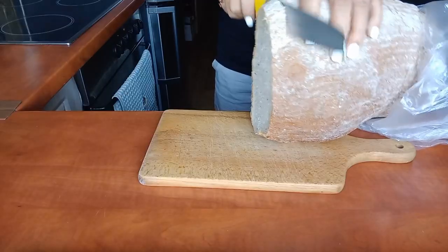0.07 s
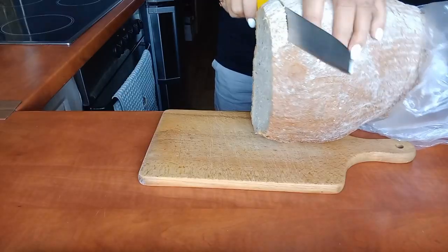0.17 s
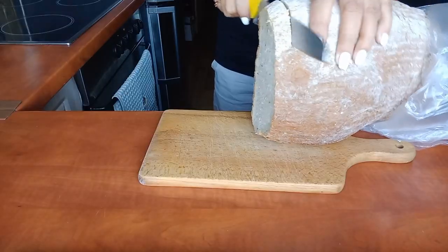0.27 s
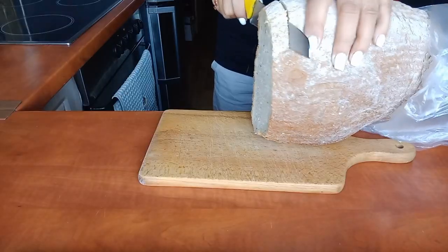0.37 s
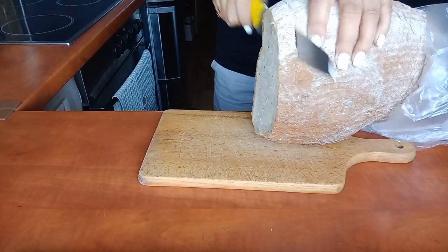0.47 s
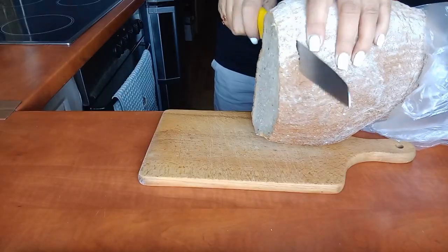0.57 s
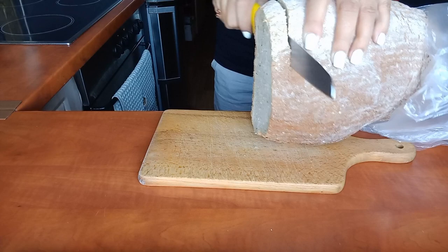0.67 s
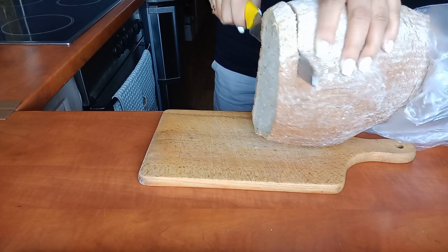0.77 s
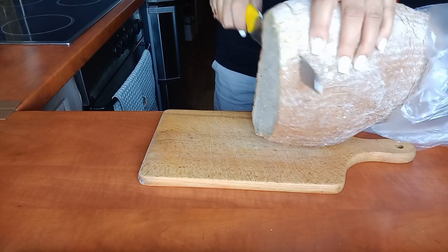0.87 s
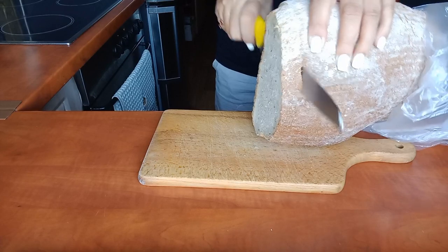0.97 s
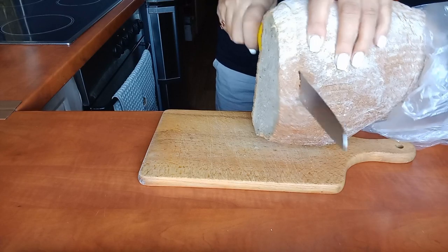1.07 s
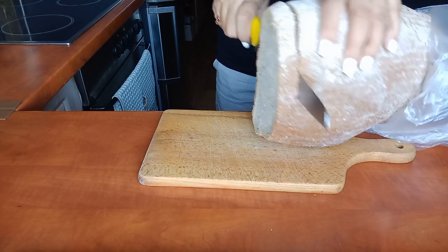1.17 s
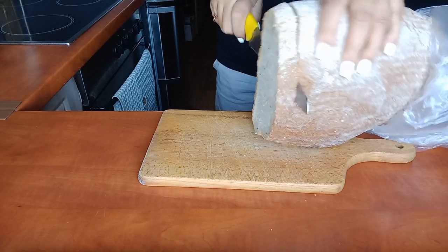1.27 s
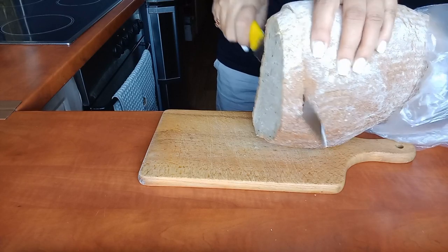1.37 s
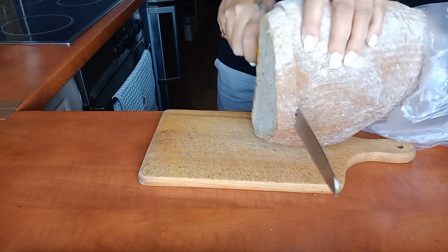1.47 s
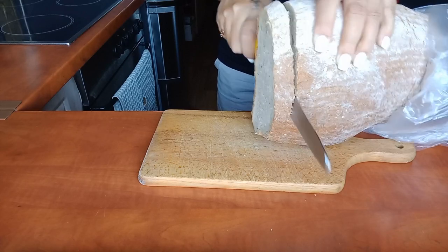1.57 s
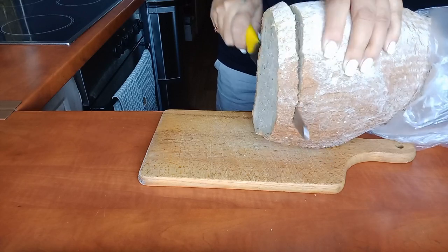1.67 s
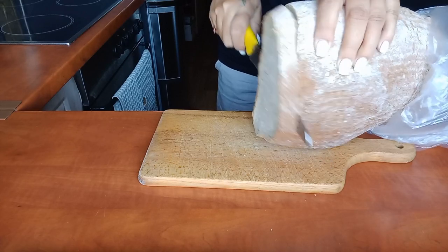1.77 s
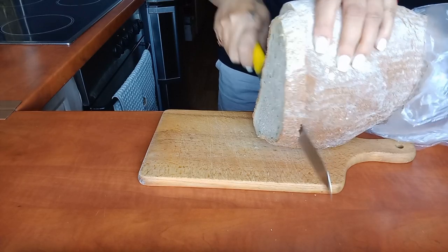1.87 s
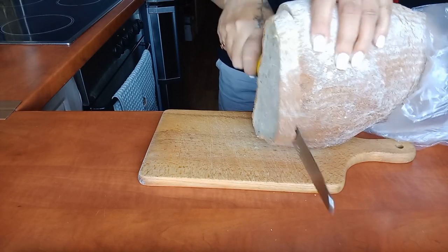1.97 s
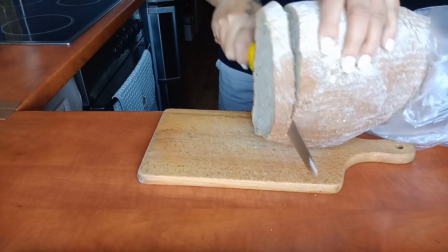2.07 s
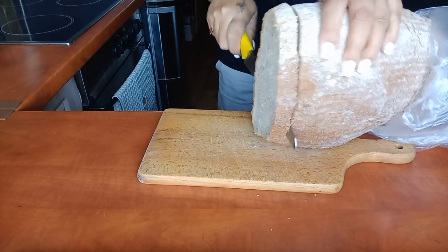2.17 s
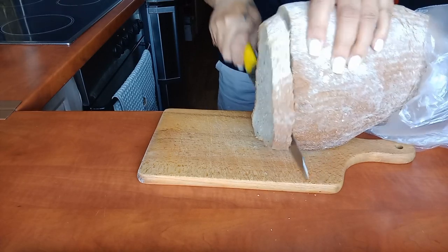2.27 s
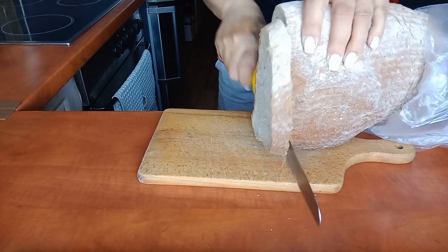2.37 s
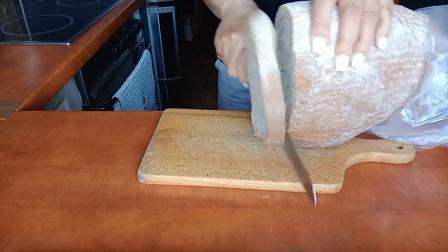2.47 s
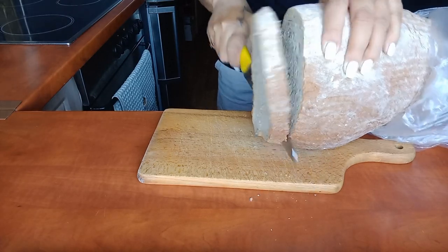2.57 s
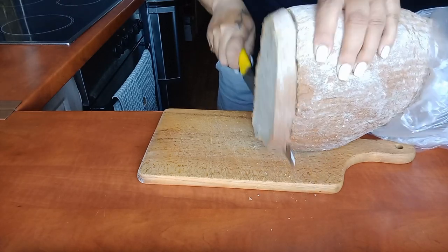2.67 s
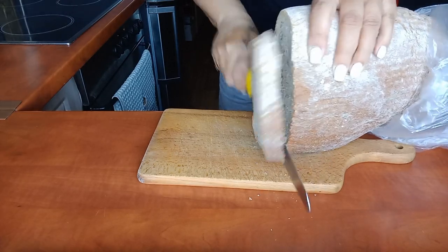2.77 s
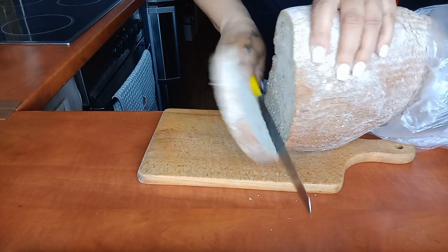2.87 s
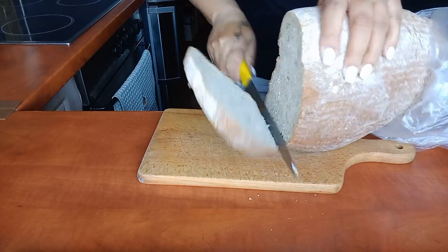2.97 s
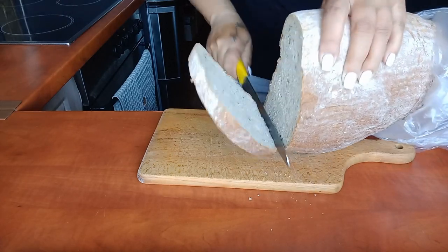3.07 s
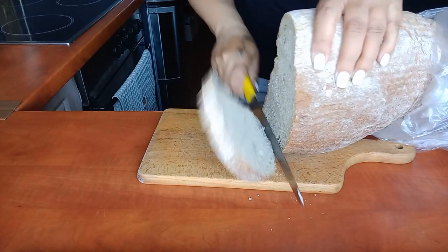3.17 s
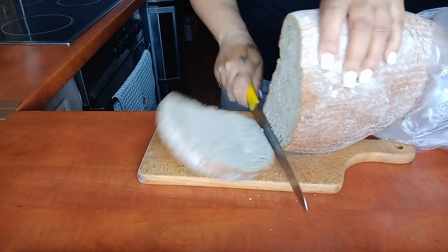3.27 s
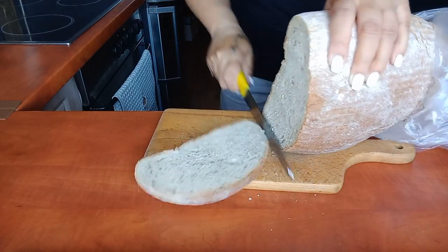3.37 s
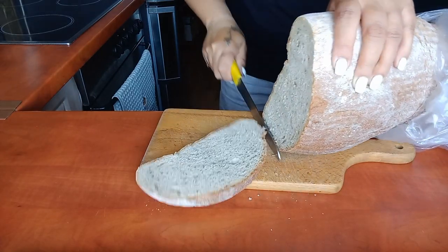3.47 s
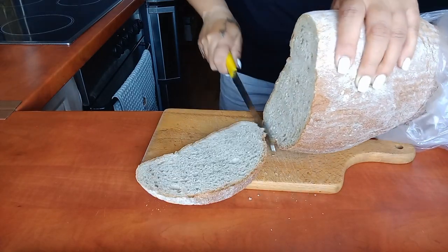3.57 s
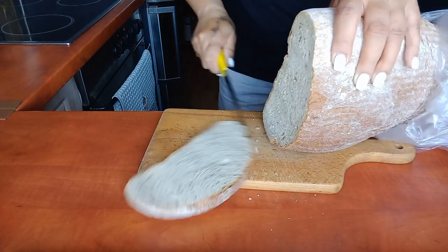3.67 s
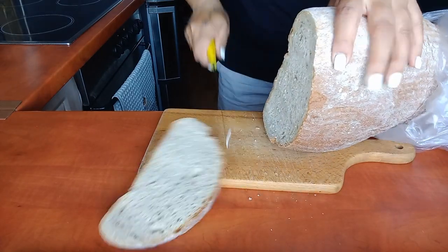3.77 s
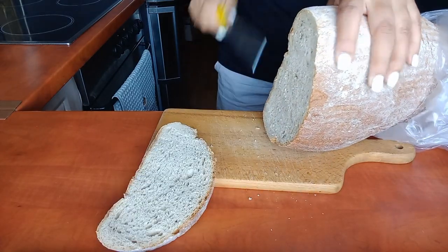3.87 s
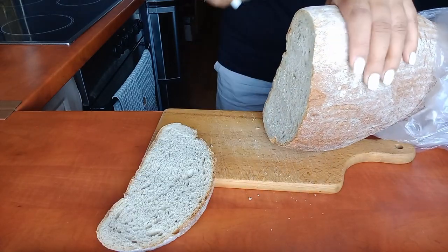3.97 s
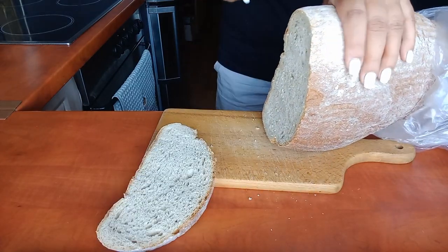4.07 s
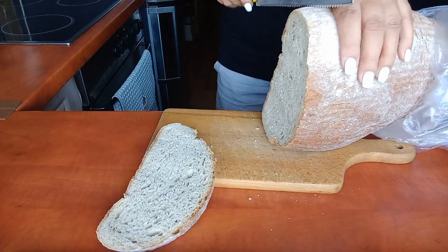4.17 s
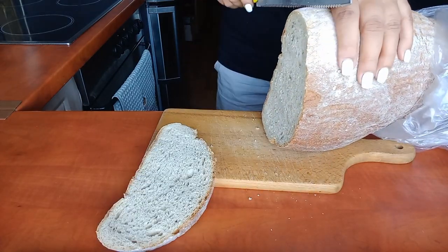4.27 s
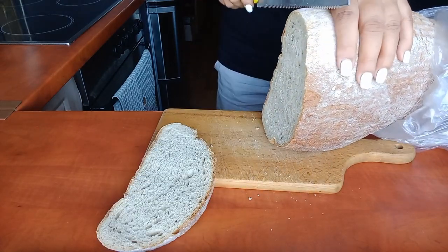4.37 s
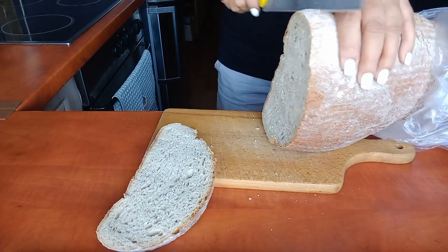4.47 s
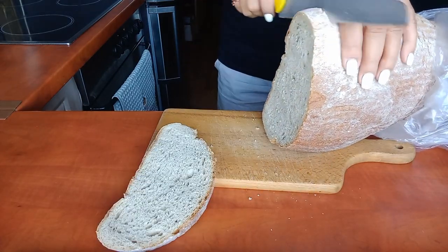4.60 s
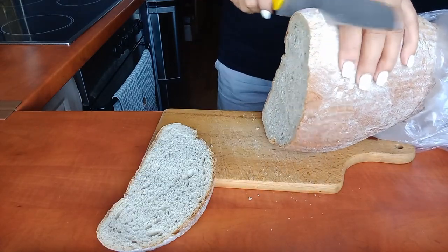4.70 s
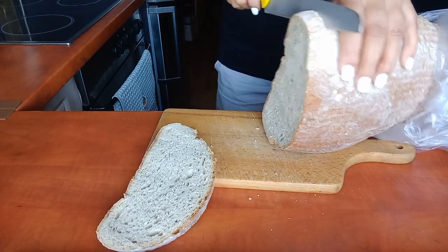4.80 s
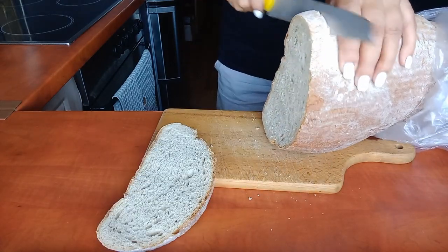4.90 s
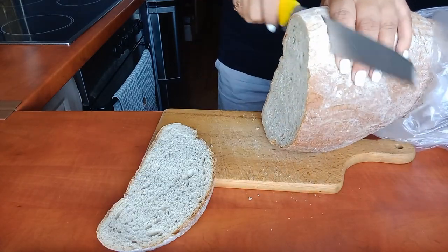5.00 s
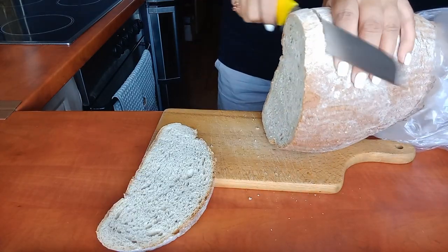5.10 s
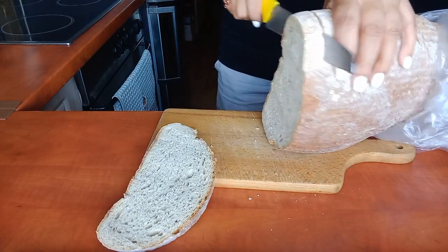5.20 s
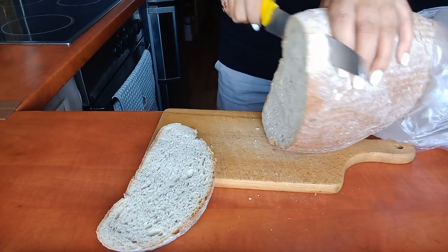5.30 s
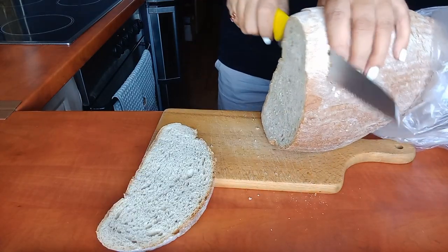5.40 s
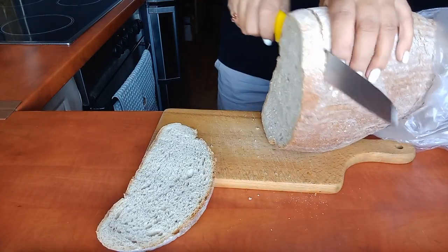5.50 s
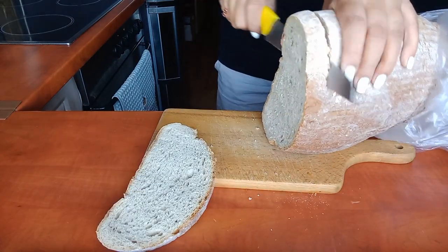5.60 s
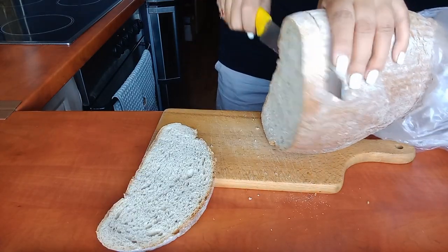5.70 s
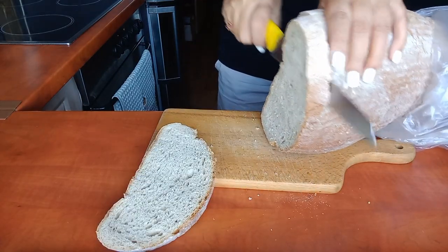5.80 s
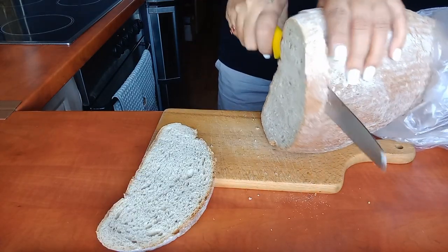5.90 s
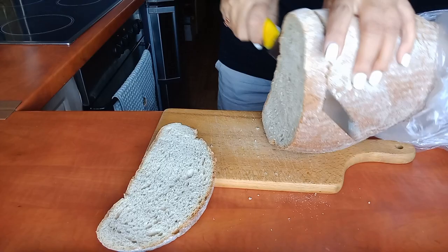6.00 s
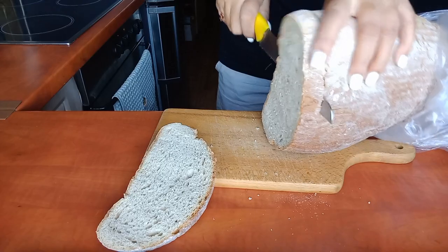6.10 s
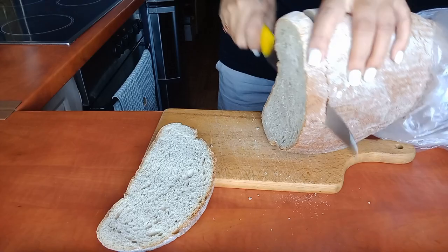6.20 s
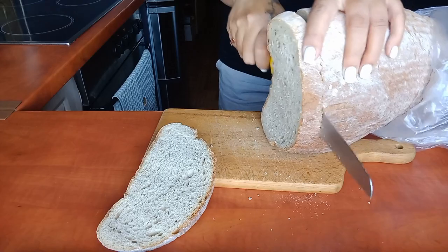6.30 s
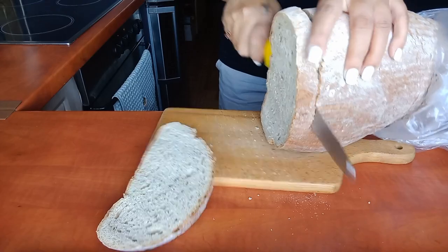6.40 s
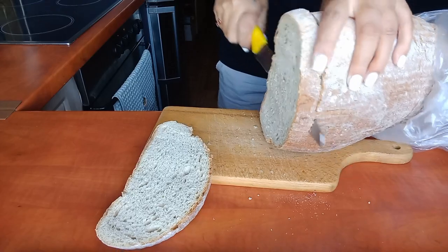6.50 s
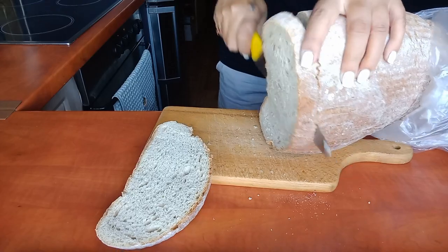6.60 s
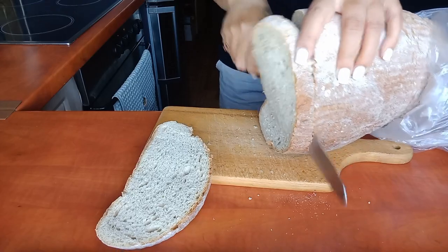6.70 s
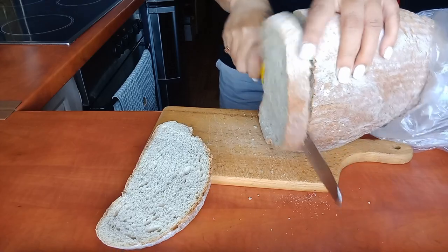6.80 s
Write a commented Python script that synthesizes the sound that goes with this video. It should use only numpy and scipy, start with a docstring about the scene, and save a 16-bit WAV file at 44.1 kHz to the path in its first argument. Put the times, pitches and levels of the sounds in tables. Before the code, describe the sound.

From the start, a serrated knife saws through a crusty loaf at about four strokes a second. The crust crackles, flakes snap and the loaf thuds softly on a wooden board, while a hollow rasp rises in pitch as the blade sinks. At about 3.4 seconds the knife breaks through and hits the board with a sharp knock, the loudest moment; the last crust tears and the blade skids briefly over the wood. The board chatters lightly until 3.7 seconds under a thin hiss as the slice falls. A plastic bag rustles faintly around 4 seconds and again from 4.5 to 5. The second slice starts gently at 4.5 seconds, and full, crunchy strokes run from about 5 seconds until nearly 7. Everything sounds close, in a bare, slightly ringing kitchen with a faint, low appliance hum.

```python
"""Over a faint appliance hum in a bare, ringing kitchen, a serrated knife saws into a crusty loaf.
The teeth catch and slip: the crust crackles, the cut rasps, flakes snap, the loaf thuds on its board.
At 3.4 s the blade breaks through and knocks on the wood; the last crust tears and the blade skids.
The board chatters under a thin, crisp hiss as the blade slides out and the slice falls.
Later a plastic bag rustles, and at 4.5 s the next slice begins."""
import sys
import numpy as np
from scipy import signal
from scipy.fft import rfft, irfft
from scipy.io import wavfile
from scipy.ndimage import uniform_filter1d, minimum_filter1d

SR = 44100
rng = np.random.default_rng(int(sys.argv[2]) if len(sys.argv) > 2 else 0)


def transcribe(u):
    """Save the signal u as a 16-bit wav file named by the first command-line argument.

    u: samples, shape (n,) or (channels, n), limited to [-1, 1]; the rate is SR.
    q: integer samples, one column per channel.
    """
    v = np.clip(np.atleast_2d(u).T, -1, 1)
    q = np.round(v * 32767).astype(np.int16)
    wavfile.write(sys.argv[1], SR, q)


N = 302085
TIME = np.arange(N) / SR

# EQ of the room tone. Each row: frequency in Hz, relative level in dB.
ROOM_TONE_EQ = [(30, -33), (60, -11), (87, -1.5), (110, -12.5), (175, -2.5), (230, -16), (400, -19.5),
                (600, -22.5), (850, -17.5), (1100, -27.5), (2250, -31.5), (7650, -26.5), (9340, -34.5),
                (15800, -37.5)]
# The appliance's hum. Each row: frequency in Hz, level in dB.
HUM_PARTIALS = [(87, -72), (174, -66.5)]
PUSH, PULL = 0, 1
# Knife strokes. Each row: start in seconds, direction, length in seconds, bite of the teeth in dB,
# weight on the loaf in dB.
STROKES = [(.009, PUSH, 0.14, -40, -35.5), (0.251, PULL, 0.1, -36, -44), (.468, PUSH, 0.1, -42, -37),
           (.714, PULL, 0.094, -38.5, -33.5), (.915, PUSH, 0.14, -41.5, -35.5),
           (1.181, PULL, 0.1, -39, -32), (1.375, PUSH, 0.13, -37.5, -33), (1.62, PULL, 0.098, -37.5, -31.5),
           (1.829, PUSH, .13, -40.5, -34.5), (2.074, PULL, 0.14, -42.5, -34.5),
           (2.295, PUSH, 0.11, -39.5, -39.5), (2.533, PULL, 0.12, -42, -41),
           (2.731, PUSH, .12, -40.5, -43.5), (2.955, PULL, 0.14, -45.5, -42.5),
           (3.148, PUSH, 0.14, -40, -32), (3.321, PULL, 0.072, -46, -41), (3.39, PULL, 0.16, -36, -30),
           (4.507, PUSH, 0.12, -48.5, -40.5), (4.734, PULL, 0.11, -46.5, -44.5),
           (4.934, PUSH, .13, -37.3, -34), (5.148, PULL, 0.092, -37, -41), (5.34, PUSH, 0.12, -41, -32),
           (5.576, PULL, 0.097, -41, -35), (5.777, PUSH, 0.13, -40, -38), (6.003, PULL, 0.11, -39, -37),
           (6.201, PUSH, 0.13, -38.5, -32.5), (6.443, PULL, .1, -39, -33.5),
           (6.651, PUSH, 0.13, -39.5, -35)]
# Slices. Each row: time the blade enters in seconds, time by which the cut's hollow tone has risen
# to its highest in seconds, tooth rate on the pull in Hz, resonance of the shallow cut in Hz.
SLICES = [(0.0, 2.61, 124, 340), (4.5, 6.88, 163.3, 473)]
ENTERS, TONE_HIGHEST, PULL_RATE, SHALLOW_PITCH = 0, 1, 2, 3
# EQs of the crisp crust and the darker rasp. Each row: frequency in Hz, relative level in dB.
CRUST_EQ = [(600, -18), (1300, 0.5), (2000, 1.5), (3000, -1), (4700, -2.5), (6300, -4.5), (8300, -2),
            (9200, -13.5), (11000, -11), (13500, -10), (16000, -14)]
RASP_EQ = [(150, -17.5), (280, 4), (350, 3.5), (410, -2), (480, 3), (600, 0), (780, -2.5), (900, -2.5),
           (1050, -8.5), (1450, -6), (2200, -17), (4000, -37.5)]
# The loaf pressed on the board. Each row: frequency in Hz, gain in dB, 60 dB decay time in seconds.
LOAF_MODES = [(75.3, -24, .07), (103.3, 5, 0.16), (131.4, 0, 0.21), (175.8, -10, 0.45), (199.5, -2.5, 0.21),
              (214.2, -8.5, 0.298), (278.3, -17, 0.26)]
# Larger flakes snapping, and the loaf bumping the board. Each row: time in seconds, strength in dB.
SNAPS = [(0.0712, -10.5), (0.4638, -17.5), (1.009, -15), (1.473, -15), (1.6739, -21), (1.8836, -6.5),
         (1.9005, -16), (3.4558, -14), (5.8212, -7), (6.2186, -11), (6.4424, -16), (6.677, -14),
         (6.7393, -7.5)]
BUMPS = [(.509, -28.5), (1.247, -31), (2.171, -34), (5.805, -32), (6.08, -33.5)]
# Blade and board knocking. Each row: time in seconds, strength in dB.
KNOCKS = [(3.4053, -26), (3.4257, 3.5), (3.4525, -30), (3.533, -17.5), (3.619, -23), (3.6542, -21),
          (3.6796, -25), (3.696, -20), (3.717, -28)]
# EQ of a knock's attack. Each row: frequency in Hz, relative level in dB.
KNOCK_EQ = [(30, -53), (60, -35), (250, -22.5), (500, -13.5), (850, -0.5), (1250, -8.5), (1700, -8.5),
            (2300, -28), (5000, -29.5), (16000, -38)]
# The board on the counter. Each row: frequency in Hz, gain in dB, 60 dB decay time in seconds.
BOARD_MODES = [(132, -40, 1), (344.3, -33, 0.64), (490.5, -26.5, 0.17), (650, -33.5, 0.143),
               (823, -19.5, 0.078), (906.4, -23, 0.17), (1080, -33, 0.21), (1080, -31.5, .2),
               (1330, -31, 0.46), (1530, -31, .15)]
# Gestures. Each row: start in seconds, length in seconds, relative level in dB.
TEAR = [(3.44, 0.02, -31.5)]  # the last crust tears
SKIDS = [(3.447, 0.155, -23), (3.668, 0.047, -29)]  # the blade skids back over the board
HISS_AND_RUSTLES = [(3.6, 0.15, -56), (3.92, .3, -60.5), (4.48, 0.53, -54.5)]  # first the hiss of blade and falling slice, later the bag
# EQs of those gestures. Each row: frequency in Hz, relative level in dB.
TEAR_EQ = [(2000, -22), (3500, -6.5), (4300, -5.5), (5400, -4), (6500, -21.5), (9000, -28), (16000, -32.5)]
SKID_EQ = [(50, -42.5), (130, -12), (450, -12), (680, -9), (790, -2), (930, 2), (1150, -14.5), (1330, -6.5),
           (1750, -29), (2550, -18.5), (3500, -32), (9000, -43.5)]
HISS_AND_RUSTLE_EQ = [(880, -34), (1500, -12.5), (4350, -1), (6380, -1.5), (8010, 4), (9280, -8),
                      (11600, -7.5), (12600, -5), (15800, -6)]
# The kitchen's reverb. Each row: frequency in Hz, 60 dB decay time in seconds.
KITCHEN_T60 = [(100, 0.51), (300, 0.34), (900, 0.35), (3000, 0.65), (8000, 0.71), (16000, 0.78)]


def from_db(db):
    """Decibels to gain."""
    return 10 ** (np.asarray(db) / 20)


def rms_one(x):
    """Scale to unit power."""
    return x / np.sqrt(np.mean(x ** 2) + 1e-20)


def steady(x, span_s):
    """Ride the gain to hold unit power over every short span."""
    power = np.mean(x ** 2, axis=0)
    return x / np.sqrt(uniform_filter1d(power, int(span_s * SR)) + 1e-4 * power.mean())


def at_hz(points, hz):
    """Read a table on a log-frequency axis."""
    f, value = np.transpose(points)
    return np.interp(np.log(np.maximum(hz, 1)), np.log(f), value)


def drift(rate_hz):
    """A random LFO of unit power."""
    knots = rng.standard_normal(4096)
    return rms_one(np.interp(TIME * rate_hz, np.arange(len(knots)), knots))


def eq(x, curve, size=8192):
    """Minimum-phase stereo EQ; a unit click comes out with peak 1."""
    cepstrum = irfft(np.log(from_db(at_hz(curve, np.fft.rfftfreq(size, 1 / SR)))))
    cepstrum[1:size // 2] *= 2
    cepstrum[size // 2 + 1:] = 0
    response = irfft(np.exp(rfft(cepstrum)))[:size // 2]
    return signal.fftconvolve(x, response[None] / np.abs(response).max(), axes=1)[:, :N]


def ring(force, modes):
    """Sum of damped modes driven by a force."""
    out = 0
    for hz, level_db, t60 in modes:
        radius, angle = from_db(-60 / (t60 * SR)), 2 * np.pi * hz / SR
        poles = [1, -2 * radius * np.cos(angle), radius ** 2]
        out = out + from_db(level_db) * signal.lfilter([0, np.sin(angle)], poles, force + 1e-18)
    return out


def clicks(events):
    """One impulse for each row of time and strength."""
    time_s, level_db = np.transpose(events)
    return np.bincount((time_s * SR).astype(int), from_db(level_db), N)[:N]


def fade(x, decay_s):
    """Give each impulse an exponential tail."""
    return signal.lfilter([1], [1, -np.exp(-1 / (decay_s * SR))], x + 1e-18)


def grains(per_s, spread_db):
    """Tiny clicks of uneven size at random moments."""
    sizes = from_db(spread_db * np.minimum(rng.exponential(1, N), 4))
    return sizes * rng.choice([-1, 1], N) * (rng.random(N) < per_s / SR)


def radiate(x, scatter):
    """Mono to stereo: every impulse radiates unevenly, so each side gets its own share."""
    return x * (1 + scatter * rng.standard_normal((2, N))) / np.sqrt(1 + scatter ** 2)


def delayed(x, lag_s):
    """The same sound a little later."""
    return np.interp(TIME - lag_s, TIME, x, left=0)


def swells(gestures, attack_s, fade_db_per_s, release_s):
    """Envelope of gestures: each sets in, weakens steadily and is released."""
    gain = 0
    for start, length, level_db in gestures:
        t = np.maximum(TIME - start, 0)
        attack = np.minimum(t / attack_s, 1)
        release = np.exp(-np.maximum(t - length, 0) / release_s)
        gain = gain + attack * from_db(level_db - fade_db_per_s * t) * release
    return gain


def room_tone():
    """The bed: soft room noise and a wavering appliance hum."""
    air = rms_one(eq(radiate(rng.standard_normal(N), scatter=1.0), ROOM_TONE_EQ))
    hum = sum(from_db(db) * np.sqrt(2) * np.sin(2 * np.pi * hz * TIME + 0.24 * drift(27))
              for hz, db in HUM_PARTIALS)
    return from_db(-63.5) * air + hum


def per_slice(column):
    """A setting of the slice being cut, held until the next one begins."""
    rows = np.array(SLICES)
    return rows[np.maximum(np.searchsorted(rows[:, 0], TIME) - 1, 0), column]


def cut_progress():
    """Ramp from 0 as the blade enters to 1 once the cut's hollow tone is at its highest."""
    enters, tone_highest = per_slice(ENTERS), per_slice(TONE_HIGHEST)
    return np.clip((TIME - enters) / (tone_highest - enters), 0, 1)


def arm_envelopes():
    """Each stroke gathers speed and runs out, shaping the gains of crackle, rasp and thud."""
    usual_bite_db, press_half_s = -40, 0.054
    power = np.zeros((3, N))
    for start, direction, length, bite_db, weight_db in STROKES:
        span = slice(max(int((start - .15) * SR), 0), int((start + .35) * SR))
        t = TIME[span] - start
        rise_share, steepness = (0.43, 2.5) if direction == PULL else (0.62, 2.73)  # pulls bite sooner
        rise_s = length * rise_share
        gathering = np.abs(t / rise_s - 1) ** steepness
        running_out = ((t - rise_s) / (length - rise_s)) ** 2
        swing = np.exp(-np.where(t < rise_s, gathering, running_out))
        press = np.exp(-((t - 0.58 * length) / press_half_s) ** 2)  # weight peaks just past mid-stroke
        rasp_db = bite_db + 0.52 * (bite_db - usual_bite_db)  # a hard bite brings out the rasp
        gains = [swing * from_db(bite_db), swing * from_db(rasp_db), press * from_db(weight_db)]
        power[:, span] += np.square(gains)
    crackle, rasp, thud = np.sqrt(power)
    buried_db = -6 + 8 * cut_progress()  # a buried blade rasps more
    return crackle, rasp * from_db(buried_db), thud


def tooth_catches(push_hz, jitter, uneven_db):
    """Serrations catch on the crust at an unsteady rate, faster on the pull than on the push."""
    pulling = np.zeros(N, bool)
    for start, direction, *_ in STROKES:
        pulling[TIME >= start] = direction == PULL
    rate_hz = np.where(pulling, per_slice(PULL_RATE), push_hz) * np.exp(jitter * drift(110))
    caught = np.diff(np.floor(np.cumsum(rate_hz) / SR), prepend=0)
    return caught * from_db(uneven_db * rng.standard_normal(N))


def crust_crackle(bursts, pivot_hz):
    """The crust crumbles in tiny fractures; weight on the loaf damps the lows and brightens them."""
    crumbling = rms_one(grains(per_s=8000, spread_db=2.0)) + 0.84 * rng.standard_normal(N)
    crackle = eq(radiate(crumbling * bursts, scatter=2.8), CRUST_EQ)
    start, _, length, bite_db, weight_db = np.transpose(STROKES)
    pressed_db = np.interp(TIME, start + length / 2, weight_db - bite_db)
    tilt_db = -2 + 0.27 * pressed_db + 3.0 * drift(25)  # the tone also wanders within a stroke
    lows = signal.sosfilt(signal.butter(1, pivot_hz, fs=SR, output="sos"), crackle)
    highs = crackle - lows
    return steady(lows * from_db(-tilt_db / 2) + highs * from_db(tilt_db), span_s=0.05)


def cut_resonance(x, width_hz, risen_hz, block=256):
    """The cut's hollow tone climbs ever faster as the blade sinks, then levels off."""
    shallow_hz = per_slice(SHALLOW_PITCH)
    wander = np.exp(0.0745 * drift(6.9))  # the cut opens and closes
    hz = shallow_hz * (risen_hz / shallow_hz) ** (cut_progress() ** 5.2) * wander
    radius, angle = np.exp(-np.pi * width_hz / SR), 2 * np.pi * hz / SR
    out, state = np.zeros_like(x), np.zeros((2, 2))
    for i in range(0, N, block):
        poles = [1, -2 * radius * np.cos(angle[i]), radius ** 2]
        out[:, i:i + block], state = signal.lfilter([1, 0, -1], poles, x[:, i:i + block], zi=state)
    return out * (1 - radius ** 2) / 2


def cut_rasp(catches, bursts):
    """The teeth scrape along the cut, which adds its hollow tone."""
    scrape = 0.0607 * rms_one(catches) + rms_one(grains(per_s=3500, spread_db=2.0) * bursts)
    rasp = eq(radiate(scrape, scatter=0.39), RASP_EQ)
    return steady(rasp + 0.91 * cut_resonance(rasp, width_hz=180, risen_hz=950), span_s=0.023)


def loaf_thud(catches):
    """The low end of a stroke: each change of force jerks the loaf on the board."""
    jerks = np.diff(radiate(catches, scatter=0.32), prepend=0)
    return steady(ring(jerks, LOAF_MODES), span_s=0.021)


def sawing():
    """Every catch sets off a burst of fractures, scrapes the cut and jerks the loaf."""
    crackle_gain, rasp_gain, thud_gain = arm_envelopes()
    catches = tooth_catches(push_hz=101.33, jitter=.2, uneven_db=6.0)
    bursts = 4.2 + rms_one(fade(catches, decay_s=0.005))
    return (crust_crackle(bursts, pivot_hz=3200) * crackle_gain,
            cut_rasp(catches, bursts) * rasp_gain,
            loaf_thud(catches) * thud_gain)


def flake_snaps():
    """A flake of crust breaks in a few milliseconds of splintering."""
    splinters = fade(clicks(SNAPS), decay_s=.0012) * rng.standard_normal(N)
    return from_db(-19.5) * eq(radiate(splinters, scatter=0.34), CRUST_EQ)


def loaf_bumps(band_hz=(102, 596)):
    """The loaf tips and drops back on the board with a soft thump."""
    band = signal.butter(2, band_hz, "band", fs=SR, output="sos")
    force = signal.sosfilt(band, clicks(BUMPS) + 1e-18)
    return ring(np.array([force, force]), LOAF_MODES)


def board_knocks(lowpass_hz=1500):
    """Short, rounded blows ring the board, with slapback off the nearest surfaces."""
    blows = signal.sosfilt(signal.bessel(4, lowpass_hz, fs=SR, output="sos"), clicks(KNOCKS) + 1e-18)
    echoed = blows + 0.4 * delayed(blows, .0089) + .3 * delayed(blows, 0.013)
    force = np.array([echoed, echoed])
    return from_db(5.0) * eq(force, KNOCK_EQ) + from_db(1.0) * ring(force, BOARD_MODES)


def crust_tear():
    """The bottom crust rips in a short, bright spray of fractures."""
    rip = rms_one(eq(radiate(grains(per_s=3500, spread_db=4.0), scatter=2.1), TEAR_EQ))
    return rip * swells(TEAR, attack_s=.013, fade_db_per_s=250, release_s=.025)


def blade_skids():
    """Dense slips of the teeth on the wood keep the board sounding."""
    slips = radiate(grains(per_s=1200, spread_db=1.5), scatter=0.98)
    gain = swells(SKIDS, attack_s=0.0042, fade_db_per_s=64, release_s=0.0057)
    return from_db(-2.0) * gain * steady(eq(slips, SKID_EQ), span_s=0.0075)


def hiss_and_rustle():
    """A thin, crisp hiss as the blade slides out and the slice falls; later the plastic bag rustles."""
    texture = rms_one(eq(radiate(grains(per_s=6800, spread_db=-1.0), scatter=2.8), HISS_AND_RUSTLE_EQ))
    stroke_gain, _, _ = arm_envelopes()
    shaken = from_db(-68) * rms_one(fade(stroke_gain, decay_s=0.13))  # sawing faintly stirs the bag
    gestures = swells(HISS_AND_RUSTLES, attack_s=0.019, fade_db_per_s=11, release_s=0.032)
    return texture * (shaken + gestures)


def kitchen_reverb(predelay_s, mono_below_hz, octaves=10):
    """Dense reflections, each octave dying at its own rate; the image narrows in the bass."""
    t, tail = TIME[:SR], 0
    hz = np.fft.rfftfreq(SR, 1 / SR)
    alike = 1 / (1 + (hz / mono_below_hz) ** 2)
    mid, side = rfft(rng.standard_normal((2, SR)))
    stereo = np.sqrt(1 + alike) * mid + np.sqrt(1 - alike) * side * [[1], [-1]]
    octave = np.clip(np.log2(np.maximum(hz, 1) / 40), 0, octaves - 1)
    for k in range(octaves):
        t60 = at_hz(KITCHEN_T60, 40 * 2 ** k)
        band = irfft(stereo * np.maximum(1 - np.abs(octave - k), 0), SR)
        tail = tail + band * from_db(-60 * t / t60) / np.sqrt(t60)
    tail = tail * np.clip(t / predelay_s - 1, 0, 1)
    return tail / np.sqrt(np.sum(tail ** 2) / 2)


def place(x, reverb, left_db, send_db, left_lead_s=0.00019):
    """Direct sound, reaching the left first, plus the room; both are panned together."""
    direct = np.array([x[0], delayed(x[1], left_lead_s)])
    wet = signal.fftconvolve(x, reverb, axes=1)[:, :N]
    return (direct + from_db(send_db) * wet) * from_db([[left_db / 2], [-left_db / 2]])


def scene():
    """The mix: everything on the counter shares one kitchen reverb, over the room tone."""
    reverb = kitchen_reverb(predelay_s=0.00073, mono_below_hz=447)
    crackle, rasp, thud = sawing()
    crisp = crackle + flake_snaps() + crust_tear() + hiss_and_rustle()
    return (place(crisp, reverb, left_db=1.0, send_db=-6.5)
            + place(rasp, reverb, left_db=3.0, send_db=-4.5)
            + place(thud + loaf_bumps(), reverb, left_db=1.3, send_db=-5.0)
            + place(board_knocks(), reverb, left_db=-2.0, send_db=-9)
            + place(blade_skids(), reverb, left_db=3.0, send_db=-4.5)
            + room_tone())


def record(dry):
    """The microphone sheds deep bass, a limiter holds the loudest peak, the top is cut."""
    low_cut_hz, ceiling, high_cut_hz = 51.6, .96, 15900
    thin = signal.sosfilt(signal.butter(4, low_cut_hz, "high", fs=SR, output="sos"), dry)
    allowed = 1 / np.maximum(np.abs(thin).max(axis=0) / ceiling, 1)
    gain = uniform_filter1d(minimum_filter1d(allowed, size=129), size=129)
    return signal.sosfilt(signal.ellip(10, .2, 80, high_cut_hz, fs=SR, output="sos"), thin * gain)


dry = scene()
out = record(dry)
transcribe(out)
```